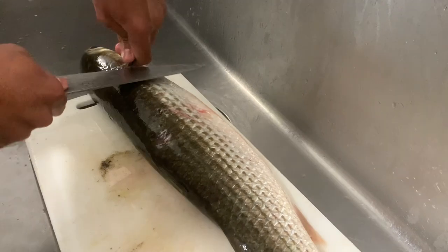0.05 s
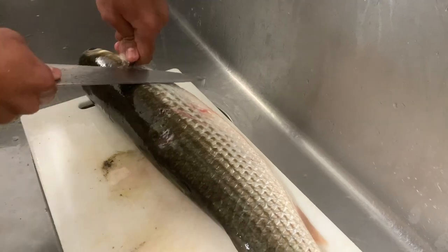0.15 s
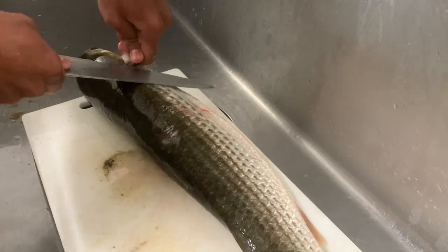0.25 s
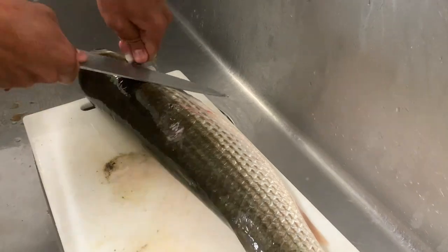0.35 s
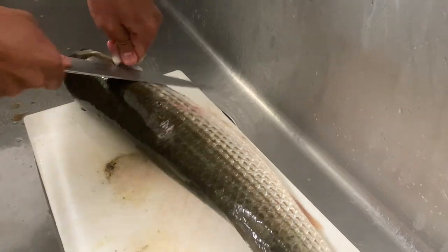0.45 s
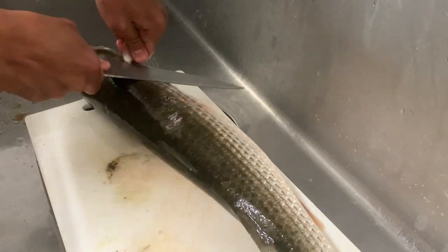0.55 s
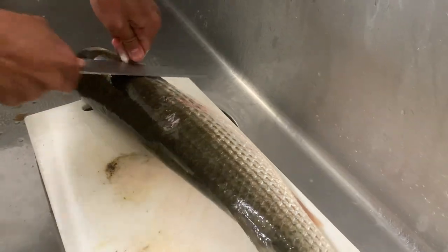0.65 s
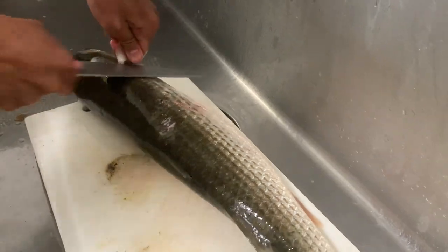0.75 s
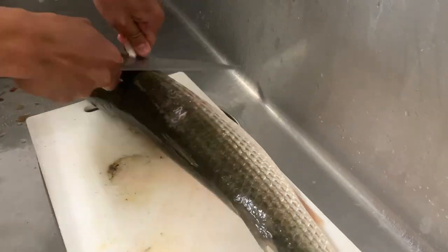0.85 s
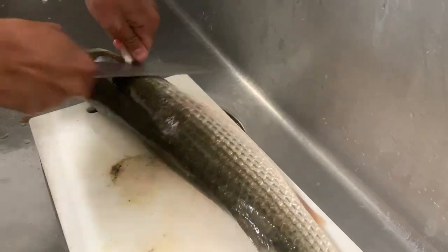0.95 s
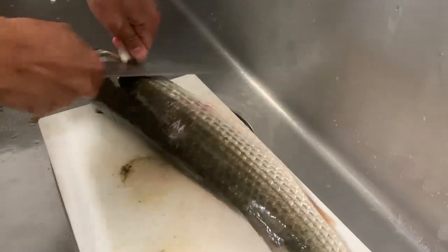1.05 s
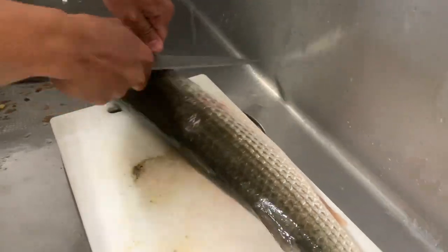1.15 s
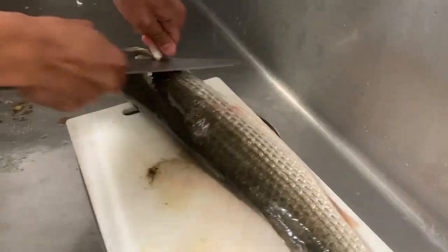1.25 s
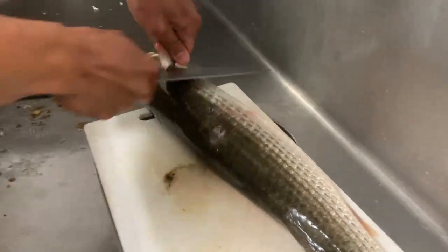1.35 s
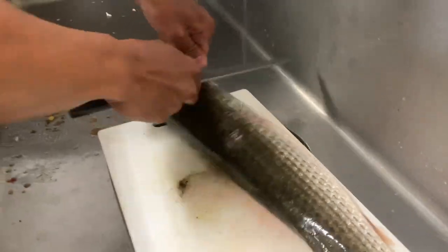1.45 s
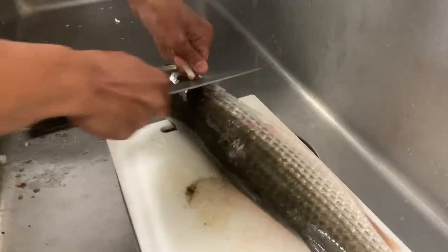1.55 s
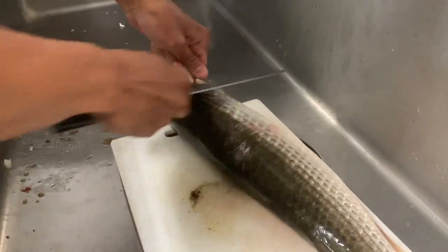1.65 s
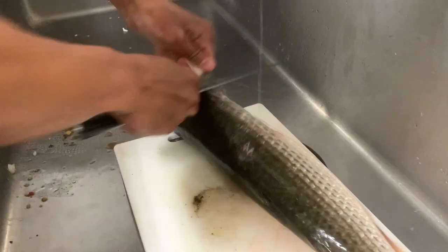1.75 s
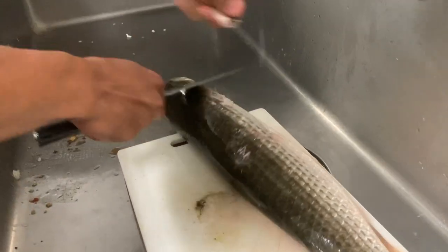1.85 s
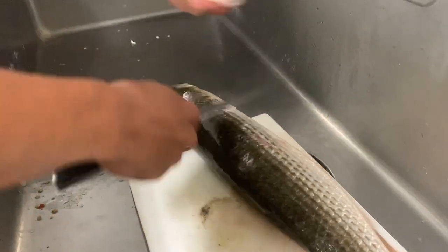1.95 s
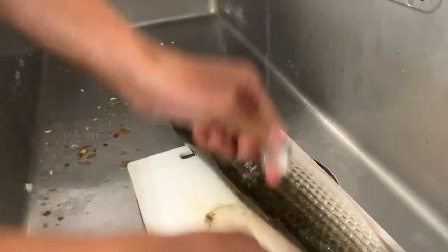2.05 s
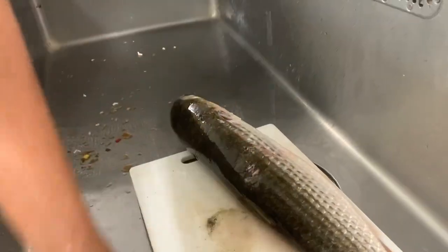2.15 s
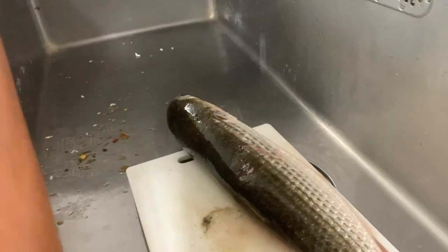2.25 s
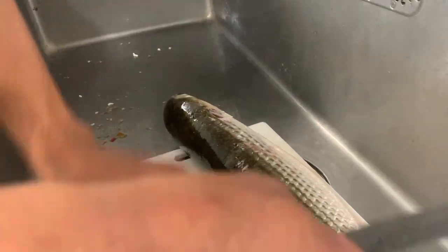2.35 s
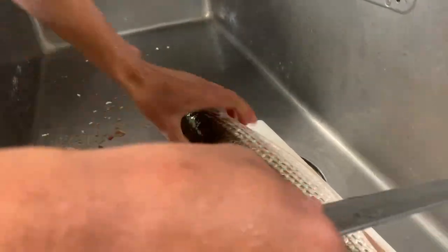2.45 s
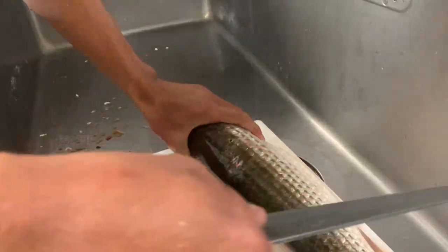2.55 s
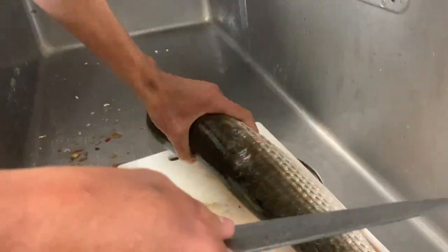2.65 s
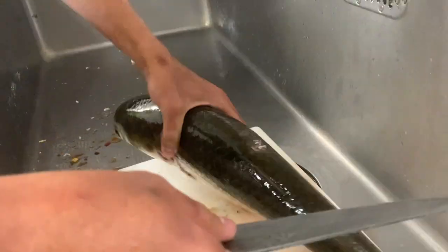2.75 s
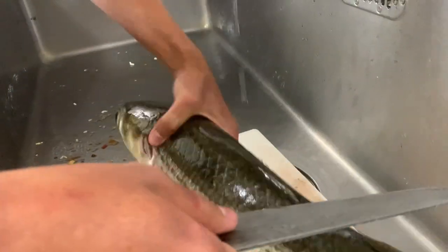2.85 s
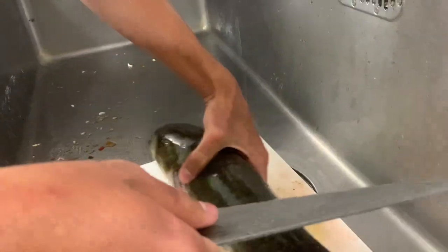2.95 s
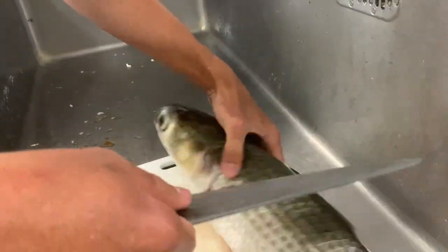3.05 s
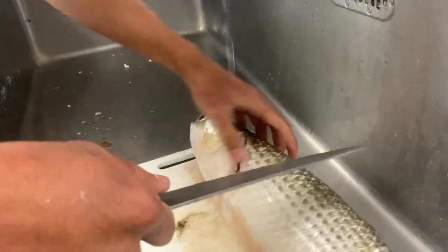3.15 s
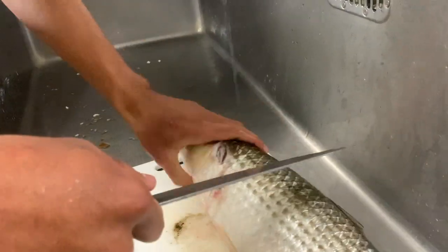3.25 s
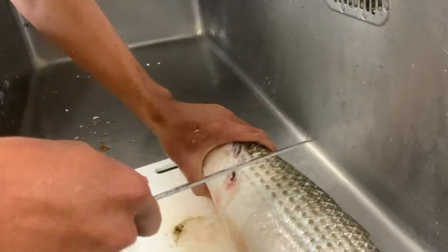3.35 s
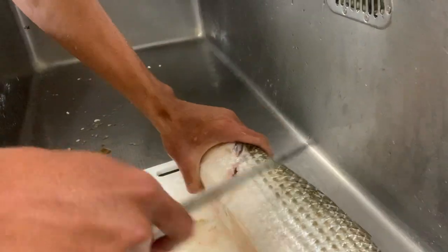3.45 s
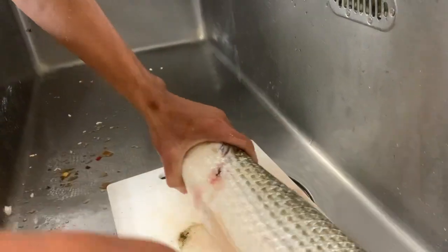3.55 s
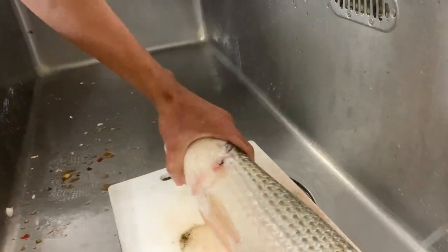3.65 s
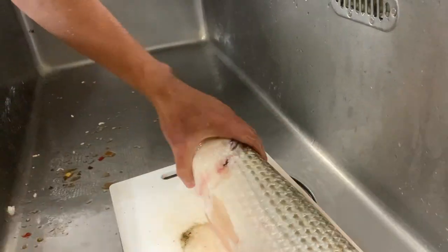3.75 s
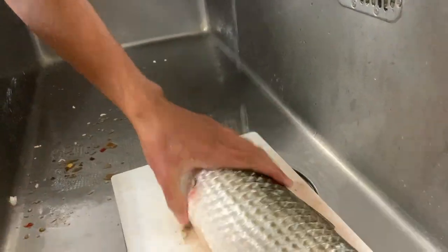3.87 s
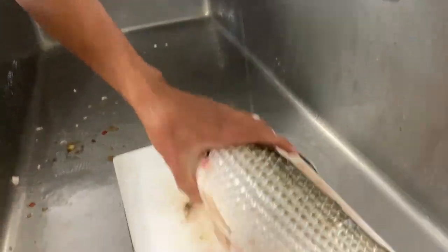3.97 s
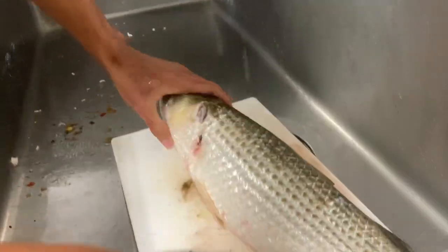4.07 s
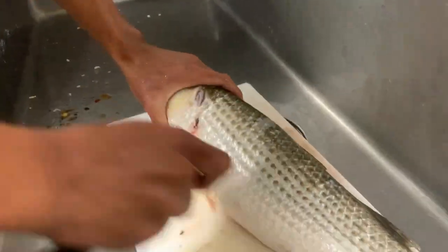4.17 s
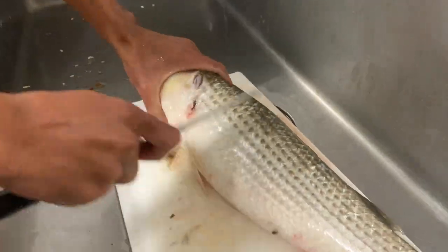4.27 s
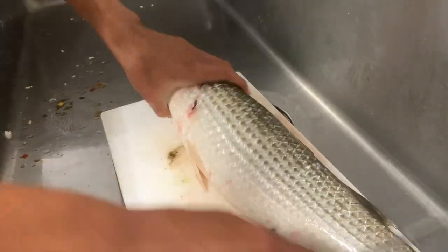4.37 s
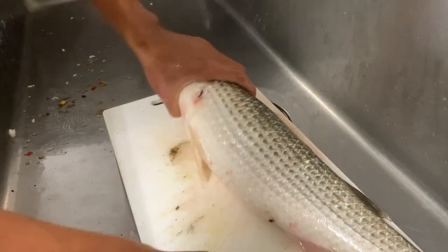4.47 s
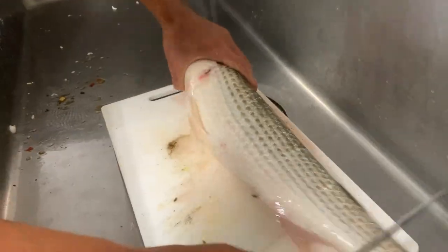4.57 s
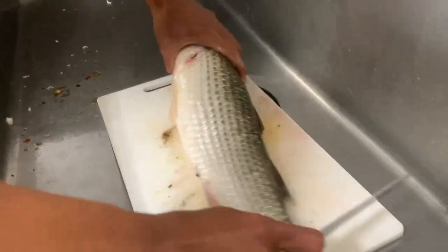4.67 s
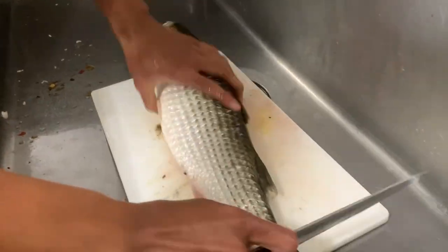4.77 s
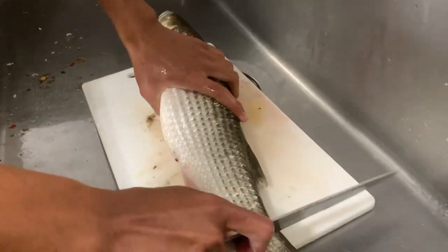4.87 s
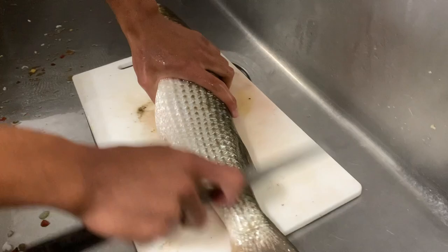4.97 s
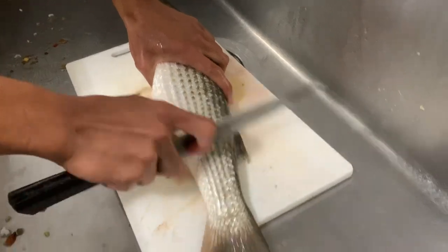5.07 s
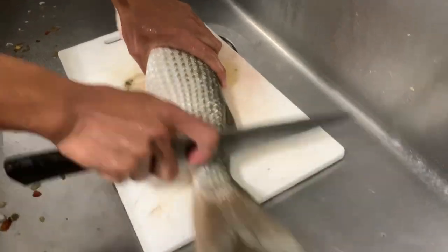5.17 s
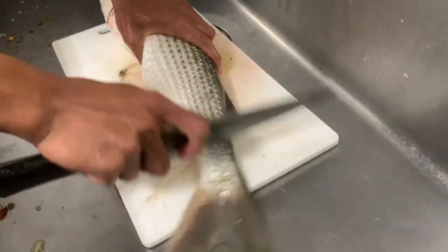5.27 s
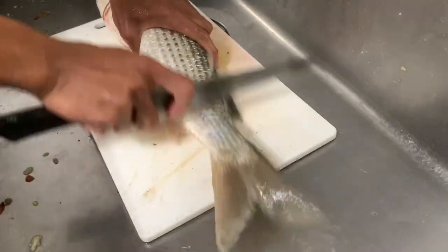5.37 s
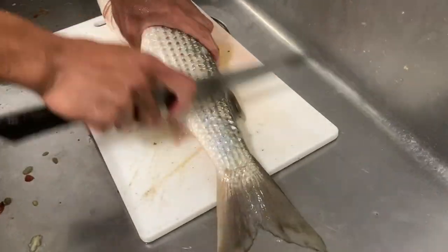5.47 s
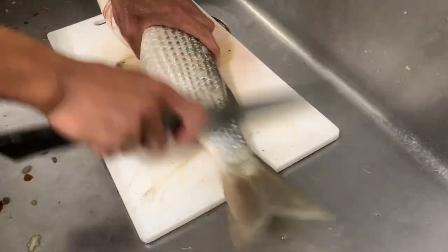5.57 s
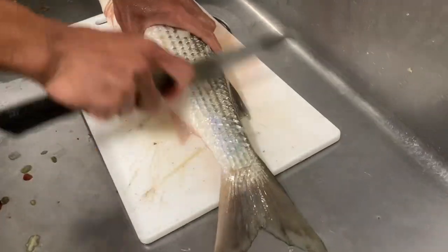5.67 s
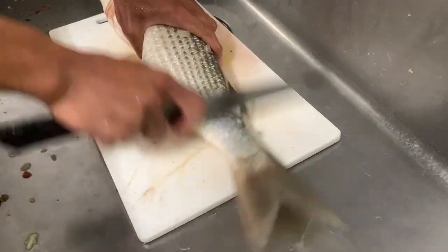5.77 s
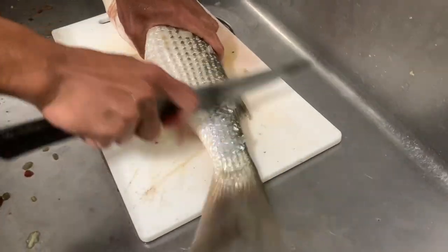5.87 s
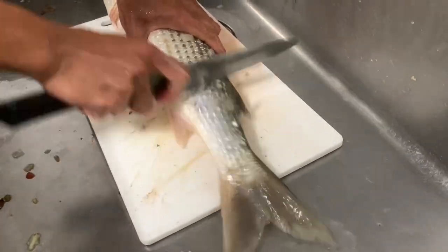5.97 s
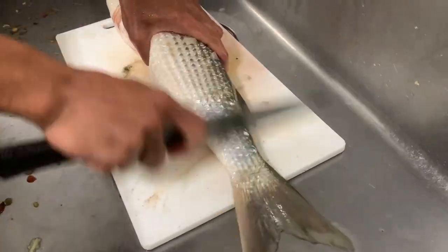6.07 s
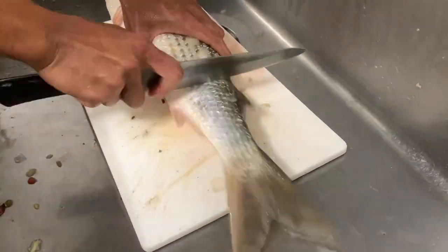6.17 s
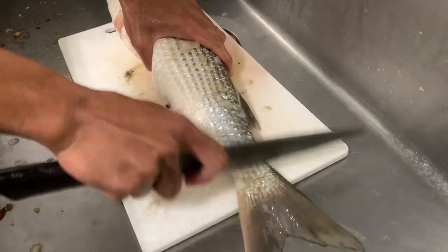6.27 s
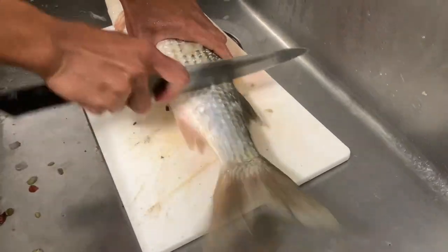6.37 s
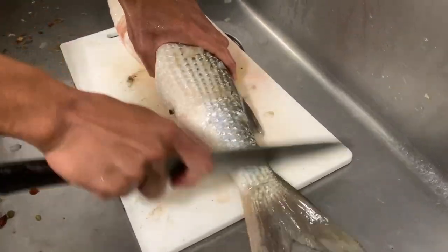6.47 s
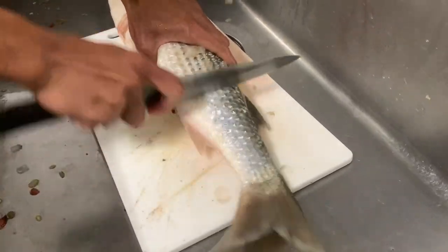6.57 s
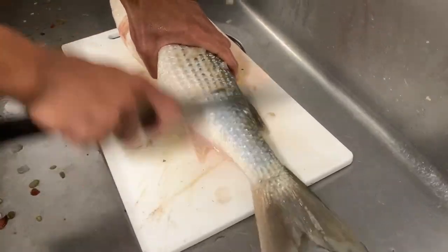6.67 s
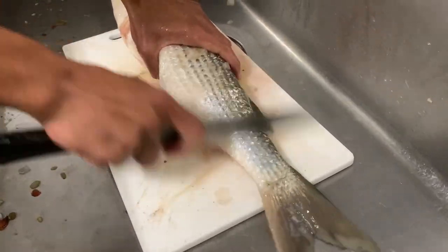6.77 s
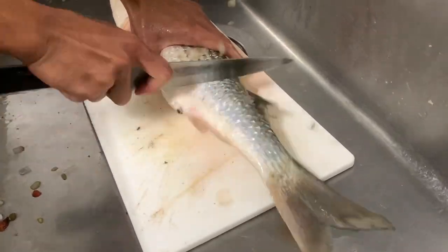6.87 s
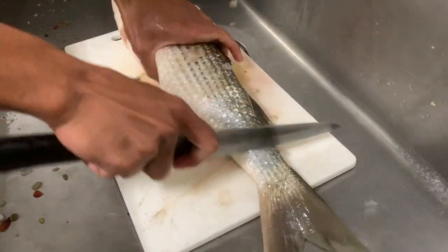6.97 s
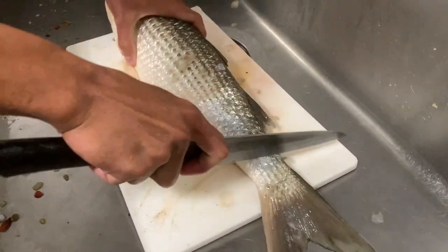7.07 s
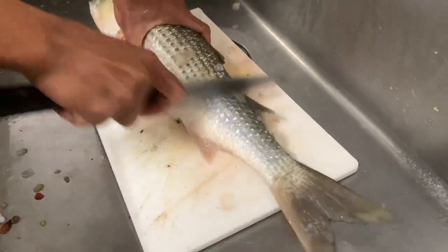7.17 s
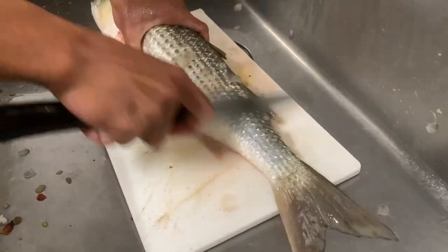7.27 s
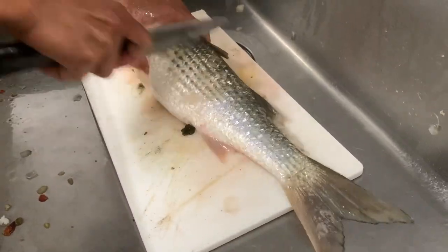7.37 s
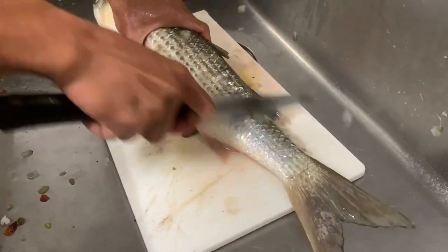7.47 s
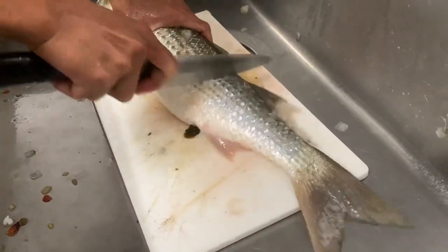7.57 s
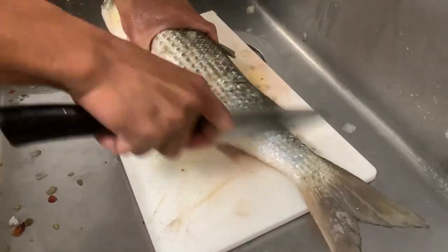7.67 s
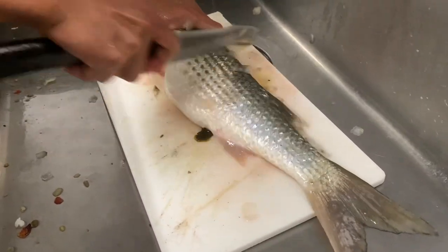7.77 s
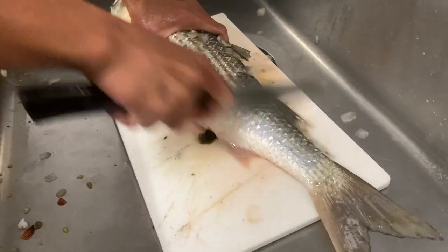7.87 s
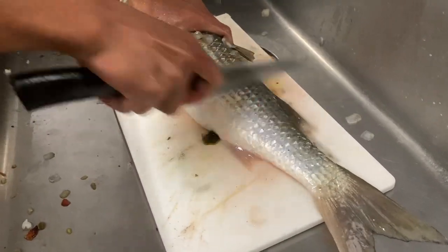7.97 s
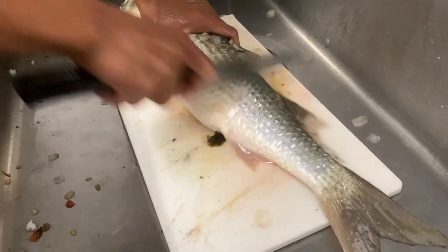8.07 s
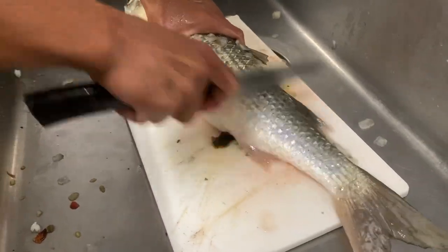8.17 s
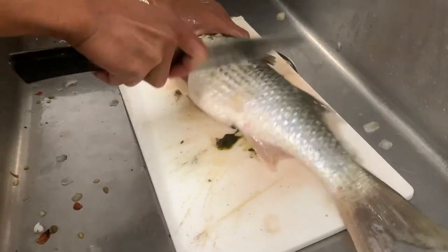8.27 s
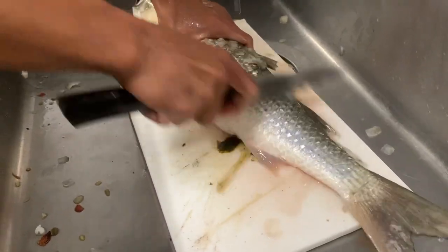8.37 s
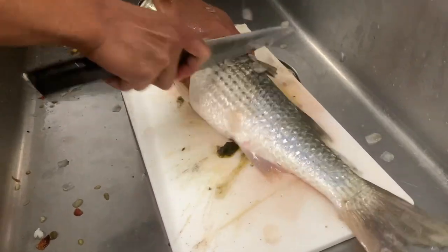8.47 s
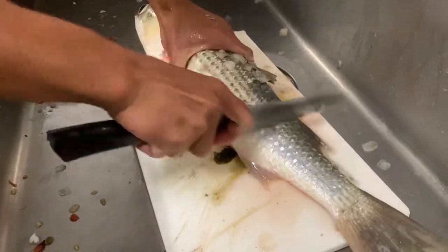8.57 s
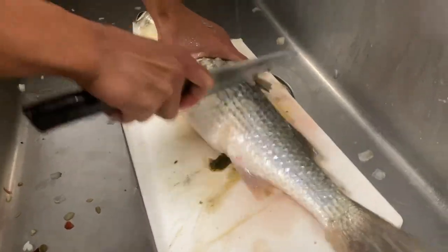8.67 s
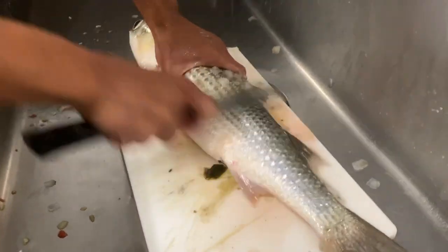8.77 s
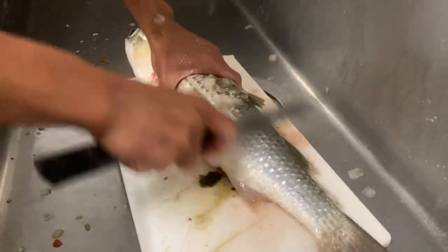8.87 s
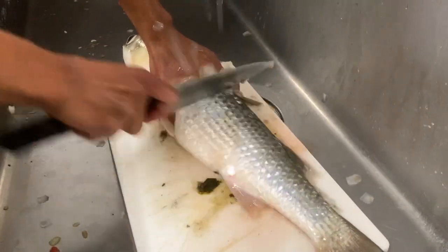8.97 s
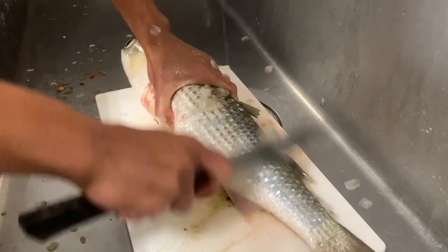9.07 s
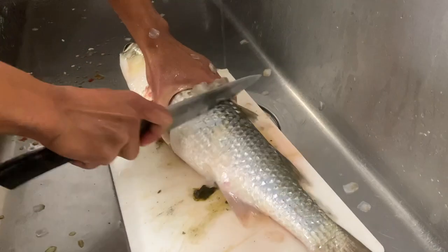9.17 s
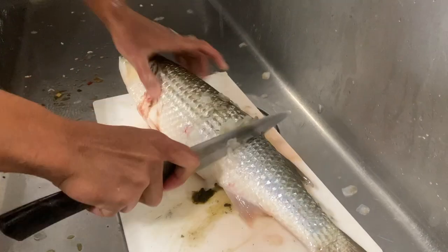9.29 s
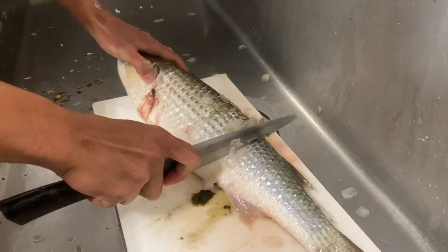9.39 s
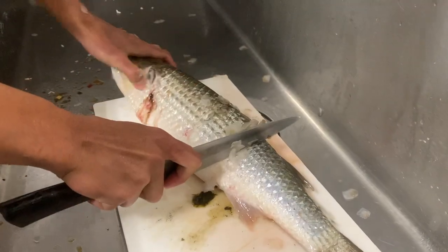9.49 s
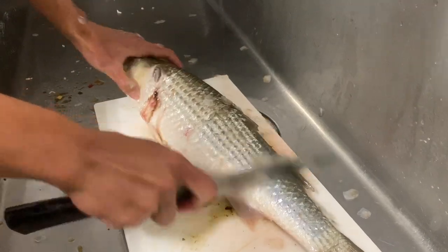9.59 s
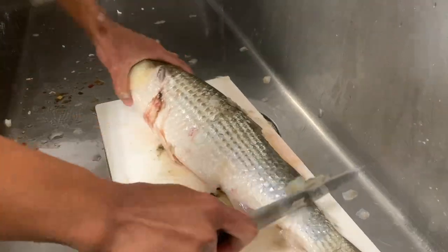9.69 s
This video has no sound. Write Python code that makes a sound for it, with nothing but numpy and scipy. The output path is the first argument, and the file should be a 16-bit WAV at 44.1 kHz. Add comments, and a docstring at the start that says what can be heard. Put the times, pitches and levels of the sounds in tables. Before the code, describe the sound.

A knife saws lightly at a fish's head, the fish thumps over on a plastic board, then quick rasping strokes rip off crackling scales.

```python
"""Ventilation and thin motor whines hum throughout, near a stereo pair of ports: noise and wavering tones.
A knife saws lightly to and fro at a fish's head on a plastic board in a steel sink: speed-driven snaps.
The blade clinks free in decaying partials, and the fish is turned over with sagging thumps and slaps.
Quick strokes then rip the scales off: showers of filtered clicks over board thuds, knocks and clatter.
Slides, ticks, clacks and squeaks fall between; the steel walls and the room return sparse echoes."""
import sys
import numpy as np
from scipy import signal
from scipy.fft import rfft, irfft
from scipy.io import wavfile
from scipy.ndimage import uniform_filter1d

SR = 44100
rng = np.random.default_rng(int(sys.argv[2]) if len(sys.argv) > 2 else 0)


def transcribe(signal):
    """Save signal, clipped to [-1, 1], as a 16-bit WAV file at the path in sys.argv[1]."""
    frames = np.atleast_2d(signal).T
    limited = np.clip(frames, -1, 1)
    pcm = np.round(limited * 32767).astype(np.int16)
    wavfile.write(sys.argv[1], SR, pcm)


N = 429093
T = np.arange(N) / SR
HZ = np.fft.rfftfreq(N, 1 / SR)

# scaling strokes: start [t/s], time to hardest moment [t/s], length [t/s], force [level/dB],
# change of force by the end [dB], rasp re crackle [dB], blade flex [0-1], relative board thud [level/dB]
STROKE_ROWS = [(4.96, 0.022, 0.079, -20, -2.5, -34, .4, -37.5),
               (5.16, .01, 0.064, -20, -14.5, -14, 0.1, -28.5),
               (5.348, 0.0044, 0.081, -15.5, -15, -22, 1, -21.5),
               (5.567, 0.0048, 0.069, -17, -7, -19, .5, -27.5),
               (5.768, 0.02, 0.083, -24.5, -8.5, -11, 0.2, -24),
               (5.961, 0.031, 0.039, -19, -10.5, -14.5, 0.3, -25.5),
               (6.133, 0.038, 0.052, -24, -16, -10.5, 0, -26.5),
               (6.312, 0.034, 0.063, -27, -4, -11.5, 0.6, -25),
               (6.488, 0.011, 0.065, -27, -3.5, -12, 0.7, -25.5),
               (6.666, 0.023, 0.061, -25.5, -8.5, -10.5, 0.7, -30),
               (6.832, 0.04, 0.063, -27, -15, -9.5, .5, -23.5),
               (7.153, 0.039, 0.057, -26.5, -0.5, -12.5, 1, -27.5),
               (7.333, 0.04, 0.061, -15.5, -6, -21, 0.6, -30),
               (7.533, 0.027, 0.028, -16.5, -8.5, -14, 0.8, -29),
               (7.695, 0.041, 0.056, -20, 1.5, -12, 0.4, -28),
               (7.884, 0.027, 0.036, -25.5, -1.5, -9, 0.8, -30),
               (8.063, 0.038, 0.053, -18.5, -17, -13, 0.8, -27.5),
               (8.247, 0.053, 0.076, -24.5, -20, -8.5, 0.5, -27),
               (8.429, 0.035, 0.044, -24, 2.5, -10.5, 1, -24.5),
               (8.605, 0.02, 0.055, -19, -12, -11.5, 1, -24.5),
               (8.774, 0.029, 0.05, -21, -2.5, -9, 0.8, -25.5),
               (8.947, 0.031, 0.058, -20.5, -9.5, -8.5, 0.5, -26),
               (9.127, 0.029, 0.053, -21, -12, -11, 1, -30.5)]
# fish flops on the board: [t/s], thud [level/dB], relative knock [level/dB], wet slap [level/dB],
# hollow slap note [f/Hz], decay [t/s]
FLOP_ROWS = [(1.767, -26.5, -38.5, -34.5, 513, 0.028), (2.266, -44, -43, -29, 466, 0.0085),
             (2.978, -22, -35, -48, 375, 0.023), (3.139, -18.5, -32, -30, 375, .03),
             (4.725, -21.5, -38, -53, 375, 0.021), (6.163, -30, -25, -31, 338, 0.0075),
             (6.688, -41, -39, -23, 366, 0.01), (6.851, -40, -36, -30, 375, 0.02),
             (7.177, -39, -44, -45, 375, 0.0058)]
# spectrum of snapping scales: [f/Hz], relative density [level/dB per Hz]
CRACKLE_SPECTRUM = [(600, -39), (2000, -16.5), (4000, -9.5), (5500, -5), (7500, -1.5), (8300, 2.5),
                    (9200, 2), (11000, 2.5), (12400, -1.5), (13400, 3.5), (15100, -2), (16000, -25.5)]
# spectrum of the shaken blade: [f/Hz], relative density [level/dB per Hz]
RASP_SPECTRUM = [(300, -13), (650, -6.5), (1100, -3), (1650, -2), (2300, -4.5), (3000, 3.5), (4500, -1.5),
                 (7000, -16), (14000, -64)]
# blade resonances: [f/Hz], width [f/Hz], lift [dB]
BLADE_MODES = [(3490, 41, 5.5), (4170, 153, 10), (4790, 130, 8.5), (6430, 830, 3.5), (6960, 180, -11),
               (9060, 560, 6), (10800, 220, 4.5)]


def amp(db):
    """Decibels to gain."""
    return 10 ** (np.asarray(db) / 20)


def unit(x):
    """Scales to rms 1."""
    return x / np.sqrt(np.mean(x ** 2) + 1e-20)


def read(points, hz=HZ):
    """Joins (Hz, value) points on a log-frequency axis."""
    f, value = np.transpose(points)
    return np.interp(np.log(hz + 1), np.log(f), value)


def at(points, s):
    """Joins (s, value) points in time."""
    return np.interp(s, *np.transpose(points))


def bumps(rows):
    """A dB curve of resonance peaks or dips."""
    return sum(db / (1 + (2 * (HZ - hz) / width) ** 2) for hz, width, db in rows)


def colour(x, db):
    """Causal unit-energy filter shaped by the dB curve: clicks ring after the blow."""
    size = 8192
    log_gain = np.interp(abs(np.fft.fftfreq(size, 1 / SR)), HZ, db) * np.log(10) / 20
    minimum_phase = np.exp(np.conj(signal.hilbert(log_gain)))
    ring = np.fft.ifft(minimum_phase).real[:size // 2]
    return signal.oaconvolve(x, ring / np.linalg.norm(ring))[:len(x)]


def shape(times, dbs):
    """An envelope through (s, dB) corners, silent outside them."""
    out, times = np.zeros(N), np.maximum.accumulate(times)
    part = slice(int(times[0] * SR), int(times[-1] * SR))
    out[part] = amp(np.interp(T[part], times, dbs))
    return out


def blow(s, db, decay_s, half_rise_s):
    """A quick rise centred on s and an exponential fall."""
    peak_s = s + half_rise_s
    return shape([s - half_rise_s, peak_s, peak_s + 6 * decay_s], [db - 30, db, db - 52])


def snaps(per_s, spread_db):
    """A random train of clicks of uneven size, rms 1."""
    size = amp(spread_db * np.minimum(rng.exponential(1, N), 4))
    return unit(size * rng.choice([-1., 1.], N) * (rng.random(N) < per_s / SR))


def flutter(span_s, depth_db):
    """A random gain through a new value every span_s."""
    steps = rng.standard_normal(N // 16)
    return amp(depth_db * np.interp(T / span_s, np.arange(len(steps)), steps))


def wavering(hz, wander_hz, count, size):
    """A tone of count samples whose pitch wanders by wander_hz rms over about size samples."""
    wander = wander_hz * unit(uniform_filter1d(rng.standard_normal(count), size))
    return np.sin(2 * np.pi * (np.cumsum(hz + wander) / SR + rng.random()))


def pressure(start, dig_s, length, force_db, ease_db):
    """One stroke, 1 at its hardest: the edge touches, digs in, eases, lifts off, and the scales settle."""
    touch_db, touch_s = -35, 0.0057  # same light touch whatever the force
    lift_s, lift_db = 0.012, -36.5  # dB re hardest moment
    settle_s, settle_db = 0.12, -48  # dB re hardest moment
    end = start + length
    return shape([start - touch_s, start, start + dig_s, end, end + lift_s, end + settle_s],
                 [-40, touch_db - force_db, 0, ease_db, lift_db, settle_db])


def catching(rows_per_s=150, jerk_db=-8.0, jerk_s=0.0028):
    """The edge hangs on a row of scales and jerks free, again and again at uneven intervals."""
    jerks = rng.uniform(0, 1.06, N) * (rng.random(N) < rows_per_s / SR)
    slip = signal.lfilter([1], [1, -np.exp(-1 / (jerk_s * SR))], jerks)
    return unit((1 + amp(jerk_db) * slip) * flutter(span_s=0.005, depth_db=2.5))


def scraping(crackle_db=0, ripple_db=6.0, ripple_hz=190, sharp_hz=2400):
    """The edge catches row after row of scales; each lets go with a snap that also shakes the blade."""
    # bending modes that come out as the blade flexes: [f/Hz], width [f/Hz], lift [dB]
    bending_modes = [(2310, 190, 11), (2990, 160, 9.7)]
    # blade ringing, more when its thin end is in play: [t/s], factor on the resonance dB [1]
    ringing = [(5, 1.1), (5.55, 0.8), (5.8, 0.5)]
    dull_rasp_db, sharpening = -26, 0.38  # dB of treble gained per dB of rasp above the dullest
    bend = 0.011  # share of detuning to either side
    catch = catching()
    crackle = snaps(per_s=5400, spread_db=4.0) * catch
    rasp = snaps(per_s=4000, spread_db=3.5) * catch
    overtones = np.minimum(HZ / 4000, 1)  # ripple grows towards the treble
    high, mid = read(CRACKLE_SPECTRUM), read(RASP_SPECTRUM)
    modes, bending = bumps(BLADE_MODES), bumps(bending_modes)
    out = np.zeros(N)
    for start, dig_s, length, force_db, ease_db, rasp_db, flex, _ in STROKE_ROWS:
        part = slice(int((start - .02) * SR), int((start + length + .15) * SR))
        force = pressure(start, dig_s, length, force_db, ease_db)[part]
        free = at(ringing, start)
        travel = np.clip((T[part] - start) / length, 0, 1)
        blade = free * modes + flex * bending
        sharper = sharpening * (rasp_db - dull_rasp_db) * np.minimum(HZ / sharp_hz, 1)
        # the contact travels along the blade: resonances sink, other overtones are favoured
        for share, detune in ((1 - travel, 1 - bend), (travel, 1 + bend)):
            steps = rng.standard_normal(size=400)
            ripple = ripple_db * overtones * np.interp(HZ / ripple_hz, np.arange(len(steps)), steps)
            ring = np.interp(HZ * detune, HZ, blade) + free * ripple
            snapping = colour(crackle[part] * force * share, high + ring)
            rasping = colour(rasp[part] * force ** 0.63 * share, mid + ring + sharper)
            out[part] += amp(force_db + crackle_db) * snapping
            out[part] += amp(force_db + rasp_db) * rasping
    return out


def sawing():
    """Rubbing follows the speed of the blade as it swings to and fro, and stops at each turn."""
    # sawing at the head: [t/s], relative mid-pass level between push and draw [level/dB]
    saw_level = [(0.45, -56.5), (0.85, -53), (1.25, -55.5), (1.47, -60), (1.7, -47)]
    from_s, to_s, passes_per_s = .436, 1.72, 13.24
    push_db = 2.5  # push above the mid-pass level, draw below
    grip = 1.3  # power of the speed
    speed = -np.sin(np.pi * passes_per_s * (T - from_s))  # first pass is a draw
    level = amp(at(saw_level, T) + push_db * speed)
    return level * abs(speed) ** grip * (T > from_s) * (T < to_s)


def sliding(level_db=2, rasp_db=-4, wet_db=-72):
    """With little pressure the blade only fizzes over the wet skin, which also crackles faintly in clumps."""
    # light slides over the skin: start [t/s], length [t/s], relative level [level/dB]
    slides = [(0.207, 0.017, -51), (1.784, 0.026, -38.5), (2.742, 0.066, -58), (4.715, 0.068, -49.5),
              (5.449, 0.012, -35.5), (6.052, 0.03, -40), (6.912, 0.016, -39.5), (7.23, 0.052, -47.5),
              (7.424, 0.07, -42.5), (7.973, 0.0059, -38), (8.511, 0.013, -40), (9.217, 0.072, -47.5)]
    force = sum(amp(db) * shape([s - .015, s + 0.0074, s + length, s + length + 0.026],
                                [-49, -6.0, -1.0, -32])
                for s, length, db in slides)
    wet = amp(wet_db) * flutter(span_s=.05, depth_db=6)
    force = force + sawing() + wet
    grain = force * snaps(per_s=2800, spread_db=3.0) * flutter(span_s=0.006, depth_db=4.5)
    modes = bumps(BLADE_MODES)
    fizz = colour(grain, read(CRACKLE_SPECTRUM) + modes)
    rasp = colour(grain, read(RASP_SPECTRUM) + modes)
    return amp(level_db) * fizz + amp(rasp_db) * rasp


def ticking(tick_db=0, clack_db=-12, decay_s=0.0019):
    """Single scales snap or land in brief noise bursts; the blade clacks on bone and hard scales."""
    # loudest single scales: [t/s], envelope peak of the crack [level/dB]
    tick_rows = [(0.554, -27.5), (0.777, -44), (0.825, -30), (0.975, -37), (1.1874, -25), (1.648, -39),
                 (3.5595, -36.5), (4.0992, -35), (5.0751, -23.5), (5.3965, -14.5), (5.674, -27),
                 (5.841, -19.5), (6.0782, -23.5), (6.341, -16), (6.3615, -15), (6.9586, -27.5),
                 (7.075, -32), (7.199, -22.5), (7.482, -30), (7.5502, -15), (8.103, -14.5), (8.26, -14.5),
                 (8.3227, -24), (8.4377, -20), (8.465, -30), (8.6323, -17), (8.8575, -25), (9.1531, -15)]
    # blade clacks: [t/s], clack envelope [level/dB], crack envelope [level/dB], decay [t/s]
    taps = [(0.473, -42, -44, 0.015), (1.77, -29, -29, 0.0093), (2.05, -42, -29, 0.016),
            (3.106, -34.5, -29.5, 0.0026), (4.982, -34, -37, 0.005), (5.272, -31.5, -30, 0.0048),
            (5.902, -23, -18, 0.0026), (6.267, -33, -24.5, 0.0071), (6.31, -43, -22, 0.005),
            (6.446, -21, -15.5, 0.0036), (7.723, -23.5, -19, 0.0055), (9.275, -37, -26.5, 0.004)]
    ticks = sum(blow(s, db, decay_s, half_rise_s=0.00034) for s, db in tick_rows)
    crack, clack = amp(tick_db) * ticks, amp(clack_db) * ticks
    for s, low_db, high_db, fall_s in taps:
        tap = blow(s, 0, fall_s, half_rise_s=0.0015)
        crack += amp(high_db) * tap
        clack += amp(low_db) * tap
    cracks = colour(rng.standard_normal(N) * crack, read(CRACKLE_SPECTRUM))
    clacks = colour(rng.standard_normal(N) * clack, read(RASP_SPECTRUM) + bumps(BLADE_MODES))
    return cracks + clacks


def squeaking():
    """Wet skin and hard scales judder: stick and slip drive one overtone for a moment."""
    # squeaks: [t/s], [f/Hz], [level/dB], decay [t/s]
    squeaks = [(3.152, 1800, -42, .02), (4.982, 4150, -24, .02), (4.982, 3470, -30, .02),
               (4.990, 4960, -29, .025), (4.985, 11950, -24, .025), (4.985, 13450, -23, .025),
               (5.176, 2260, -31, .012), (8.992, 2390, -29, .012), (5.355, 15400, -25, .03),
               (5.356, 10350, -23, .014), (5.576, 2860, -29, .012), (5.574, 15300, -24, .025)]
    out = np.zeros(N)
    for s, hz, db, decay_s in squeaks:
        part = slice(int((s - .01) * SR), int((s + .25) * SR))
        tone = wavering(hz, 140, count=len(T[part]), size=40)
        out[part] += blow(s, db, decay_s, half_rise_s=0.0038)[part] * tone
    return out


def clinking():
    """The blade, freed from the head, rings in close partials, most near the pitch of the contact."""
    # clinks: [t/s], relative level [level/dB], contact pitch [f/Hz], lift of partials near it [dB]
    clinks = [(1.767, -31, 4000, 24), (2.054, -29, 10800, 5)]
    # partials of the free blade: [f/Hz], relative level [level/dB]
    partials = [(2940, -12), (3930, -21), (4030, -20), (4916, -12), (5190, -5), (7429, -6), (8530, -1),
                (9440, -5), (10690, -2), (11050, -5), (12760, -3)]
    reach_hz, t60_at_4khz_s = 220, .145  # the lift halves in dB at reach_hz
    out, t = np.zeros(N), T[:SR // 4]
    for s, db, centre_hz, lift_db in clinks:
        first = int(s * SR)
        for hz, mode_db in partials:
            level_db = db + mode_db + lift_db / (1 + ((hz - centre_hz) / reach_hz) ** 2)
            t60 = t60_at_4khz_s * np.sqrt(4000 / hz)
            partial = wavering(hz, 80, count=len(t), size=40)
            out[first:first + len(t)] += amp(level_db) * np.exp(-np.log(1000) * t / t60) * partial
    return out


def flopping(first_hz=240, rest_hz=48, sag_s=0.0087):
    """The flank slaps down, then the whole weight follows in a thump whose pitch sinks."""
    out, t = np.zeros(N), T[:SR // 4]
    thump_hz = rest_hz + (first_hz - rest_hz) * np.exp(-t / sag_s)
    thump = np.sin(2 * np.pi * np.cumsum(thump_hz) / SR)
    for s, thud_db, _, slap_db, slap_hz, decay_s in FLOP_ROWS:
        first = int((s - .004) * SR)
        part = slice(first, first + len(t))
        slap = wavering(slap_hz, 86, count=len(t), size=120)
        out[part] += blow(s + 0.004, thud_db, decay_s, half_rise_s=.009)[part] * thump
        out[part] += blow(s, slap_db, 0.53 * decay_s, half_rise_s=0.0046)[part] * slap
    return out


def shudder(spectrum):
    """Irregular low vibration of the given colour."""
    return colour(rng.standard_normal(N), read(spectrum))


def steadied(x, span_s):
    """Keeps the strength of a vibration even over span_s."""
    return x / np.sqrt(abs(uniform_filter1d(x ** 2, int(span_s * SR))) + 1e-6)


def board(thud_db=1.5, knock_db=0, rock_hz=64, rock_db=-4):
    """Every push on the fish rocks the board, which knocks, clatters and booms on the floor of the sink."""
    # knock, most where the fish lies flat: [t/s], relative level [level/dB]
    knock_level = [(5, -36), (5.4, -30.5), (6.15, -27.5), (7.35, -30), (7.9, -29.5), (8.55, -42.5),
                   (8.95, -27), (9.13, -30.5)]
    # board clattering on the steel: [t/s], relative level [level/dB]
    clatter_level = [(5.2, -38.5), (5.8, -36), (6.85, -33.5), (7.2, -55), (9, -35.5)]
    # spectra of knock, thud and clatter: [f/Hz], relative density [level/dB per Hz]
    knock_spectrum = [(90, -26.5), (190, 4), (240, 7.5), (330, -9.5), (420, -20.5), (610, -17), (850, -26),
                      (1600, -44), (4000, -80)]
    thud_spectrum = [(12, -11), (28, -6.5), (42, -4), (72, 3), (110, -6.5), (170, -13.5), (260, -26.5),
                     (600, -69), (2000, -104)]
    clatter_spectrum = [(150, -14.5), (320, 2.5), (450, -0.5), (610, -0.5), (900, -7.5), (1500, -16.5),
                        (3000, -44)]
    shove_s = 0.032  # stroke start to hardest shove
    thud, knock, clatter = np.zeros((3, N))
    for start, _, length, *_, low_db in STROKE_ROWS:
        shove, end = start + shove_s, start + max(length, shove_s)
        thud += amp(low_db) * shape(
            [start - .01, start + 0.0033, shove, end + 0.011, end + 0.043, end + .11],
            [-42.0, -6.5, 2, -5.5, -17.0, -16.5])
        push = shape([start - .006, start + 0.01, shove, end + 0.0026, end + 0.11],
                     [-29, -4.5, -3.0, -18.0, -38])
        knock += amp(at(knock_level, start)) * push
        clatter += amp(at(clatter_level, start)) * push
    for s, _, wood_db, *_, decay_s in FLOP_ROWS:
        knock += blow(s, wood_db, decay_s, half_rise_s=0.0042)
    # the loaded sink floor swings at a randomly shifting pitch
    swing_hz = rock_hz * flutter(span_s=.012, depth_db=3.0)
    rocking = np.sin(2 * np.pi * np.cumsum(swing_hz) / SR)
    boom = steadied(amp(rock_db) * rocking + shudder(thud_spectrum), span_s=0.0318)
    rattle = colour(clatter * snaps(per_s=700, spread_db=1.5), read(clatter_spectrum))
    knocking = steadied(shudder(knock_spectrum), span_s=0.0152)
    return rattle + amp(thud_db) * thud * boom + amp(knock_db) * knock * knocking


def ports(x, spread):
    """A near sound reaches the two ports with a phase difference."""
    # lead of the left port at spread 1: [f/Hz], phase [rad]
    lead = [(30, 0), (430, .6), (950, .3), (1500, 3.4), (2840, 8.6), (5000, 10.4), (7200, 9.4), (8700, 6.7),
            (9730, 6.1), (11100, 3.6), (13600, .1), (16200, -3.5)]
    z, turn = rfft(x), np.exp(.5j * spread * read(lead))
    return irfft(np.array([z * turn, z / turn]), N)


def echoes(x, t60, first_s):
    """Sparse reflections of random sign, dying by t60 (Hz, s), different for each port."""
    size = 16384
    taps = rng.choice([-1., 1.], (2, size)) * (rng.random((2, size)) < 1 / 10) * (T[:size] > first_s)
    hz, t, z = signal.stft(taps, SR, nperseg=256)
    decay = np.exp(-np.log(1000) * t / read(t60, hz)[:, None])
    tail = signal.istft(z * decay, SR, nperseg=256)[1]
    tail = tail / np.linalg.norm(tail, axis=1, keepdims=True)
    return signal.oaconvolve(x[None], tail, axes=1)[:, :N]


def sink(x, t60_s=0.032, shift_s=.012):
    """The steel walls throw the sound straight back, in a reflection pattern that shifts over shift_s."""
    steps = rng.standard_normal((4, N // 16))
    places = np.array([np.interp(T / shift_s, np.arange(len(row)), row) for row in steps])
    places /= np.linalg.norm(places, axis=0)
    return sum(echoes(x * near, [(100, t60_s), (16000, t60_s)], first_s=0.00093) for near in places)


def ventilation(left_db=-1.48, right_db=-0.95):
    """Diffuse air rumble, its likeness at the two ports varying with frequency and strongest in the bass."""
    # air spectrum: [f/Hz], relative density [level/dB per Hz]
    air_spectrum = [(20, -21), (45, -1.5), (62, 2.5), (85, -2.5), (120, 1.5), (170, -5), (230, -3),
                    (290, -14.5), (430, -17.5), (510, -11), (1000, -17.5), (2000, -24.5), (5000, -33),
                    (15000, -53.5)]
    # air level before port gains and flutter: [t/s], [level/dB]
    air_level = [(0, -35.5), (4.9, -35), (5.4, -39), (9.2, -38), (9.73, -37.5)]
    # duct resonances: [f/Hz], width [f/Hz], lift [dB]
    duct = [(1000, 80, 4), (2850, 300, 2), (9000, 1500, 4)]
    # likeness at the ports before clipping to +-1: [f/Hz], correlation [1]
    likeness = [(60, 0.95), (130, 0.99), (290, 0.49), (600, -0.24), (2600, 0.00061), (2780, 0.68),
                (2940, 0.038), (7000, 0.023), (15000, -1.66)]
    a, b = rfft(rng.standard_normal((2, N)))
    same = np.clip(read(likeness), -1, 1)
    pair = np.array([a, same * a + np.sqrt(1 - same ** 2) * b])
    air = irfft(pair * amp(read(air_spectrum) + bumps(duct)), N)
    level = amp(at(air_level, T)) * flutter(span_s=.08, depth_db=0.88)
    return unit(air) * level * amp([[left_db], [right_db]])


def whining():
    """Two thin motor whines waver and swell independently at each port."""
    # motor whines: [t/s], lower [level/dB], upper [level/dB]
    whine_level = [(0, -53.5, -55), (1.5, -54, -57), (2.1, -60.5, -59), (4.8, -61, -60), (5.5, -63, -61.5),
                   (9.7, -59, -61)]
    whine_hz, wander_hz = (2776, 2938), (16, 24)
    out = np.zeros((2, N))
    for k, hz in enumerate(whine_hz):
        level = amp(at([(s, dbs[k]) for s, *dbs in whine_level], T))
        for port in range(2):
            tone = wavering(hz, wander_hz[k], count=N, size=400)
            out[port] += level * tone * unit(flutter(span_s=.05, depth_db=3.8))
    return out


def scene(direct_db=0, walls_db=-2, room_db=-20, boom_db=-9, boom_above_hz=150):
    """Knife and board, their reflections, and the ventilation."""
    # steel wall reflection: [f/Hz], relative gain [dB]
    wall_gain = [(300, 18.5), (1000, 7), (2500, -1), (4500, 3), (8000, 1), (12000, -29.5), (15000, 8)]
    # room decay: [f/Hz], t60 [t/s]
    room_t60 = [(60, 0.071), (300, 0.3), (2000, 0.26), (8000, 0.29), (15000, 0.1)]
    knife = scraping() + squeaking() + clinking() + sliding() + ticking()
    thuds = board() + flopping()
    thrown_back = irfft(rfft(knife) * amp(read(wall_gain)), N)
    near = amp(direct_db) * ports(knife, 1.0) + amp(walls_db) * sink(thrown_back)
    # deep bass stays near the board
    highpass = signal.butter(2, boom_above_hz, "high", fs=SR, output="sos")
    radiated = signal.sosfilt(highpass, thuds)
    low = ports(thuds, 0.92) * amp([[-.9], [.9]])
    low = low + amp(boom_db) * echoes(radiated, room_t60, first_s=.003)
    room = amp(room_db) * echoes(knife, room_t60, first_s=0.016)
    return near + low + room + ventilation() + whining()


def record(dry):
    """The sharpest snaps are rounded off; then the band limit."""
    ceiling, edge_hz = .7, 15900  # ceiling in full scale
    rounded = dry / (1 + (dry / ceiling) ** 4) ** (1 / 4)
    lowpass = signal.firwin(401, edge_hz, window=("kaiser", 7), fs=SR)
    return signal.oaconvolve(rounded, lowpass[None], "same")


dry = scene()
out = record(dry)
transcribe(out)
```